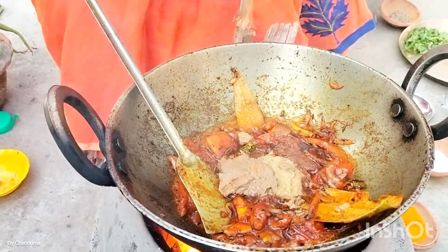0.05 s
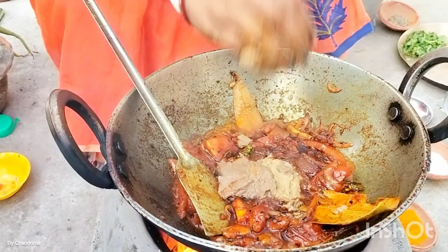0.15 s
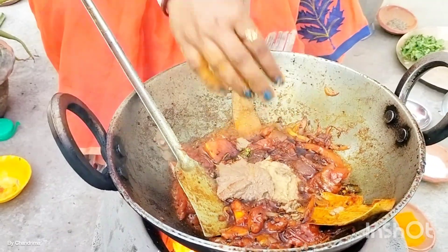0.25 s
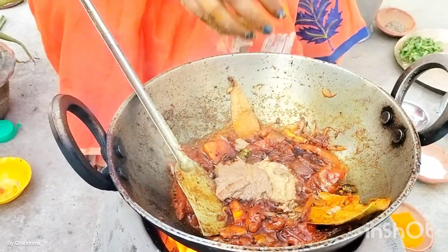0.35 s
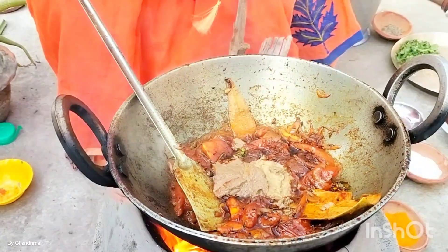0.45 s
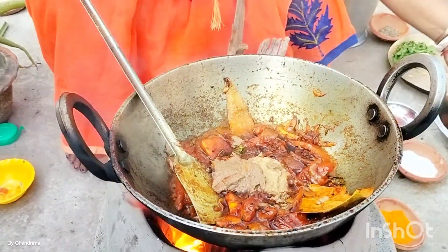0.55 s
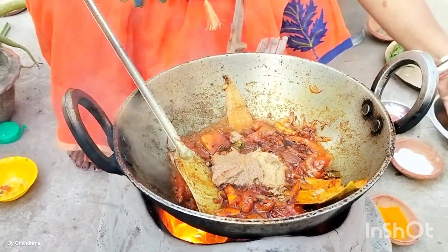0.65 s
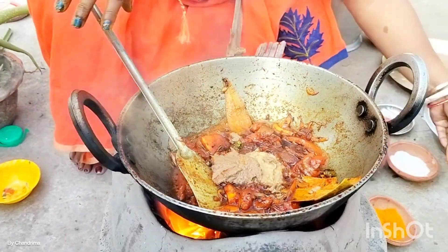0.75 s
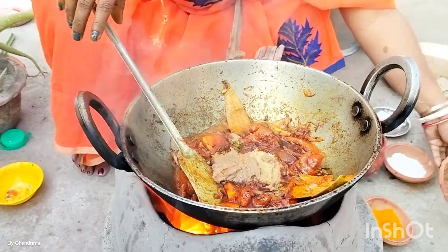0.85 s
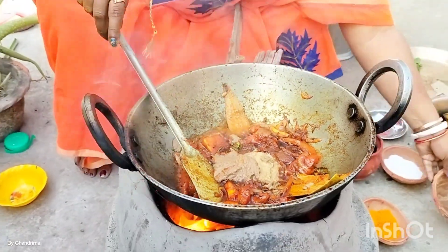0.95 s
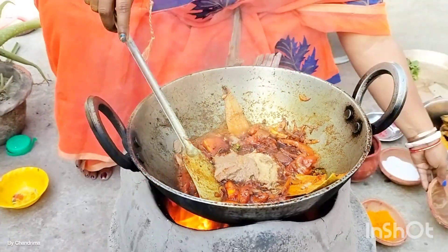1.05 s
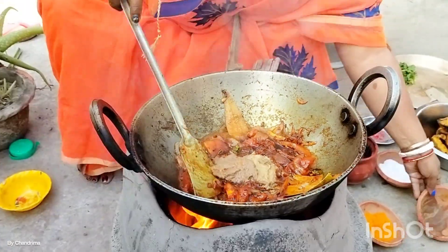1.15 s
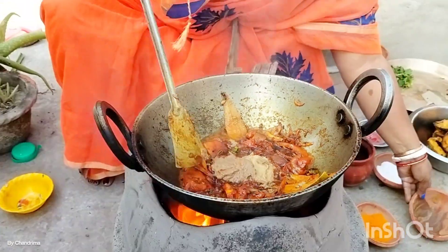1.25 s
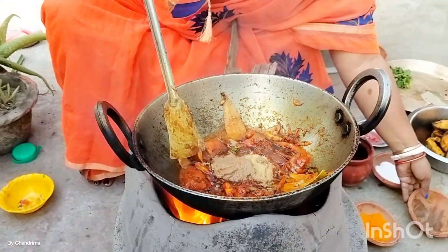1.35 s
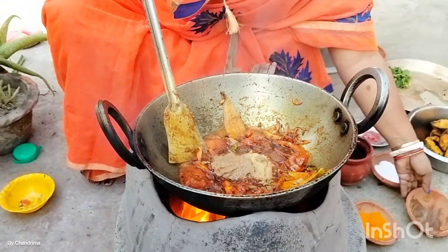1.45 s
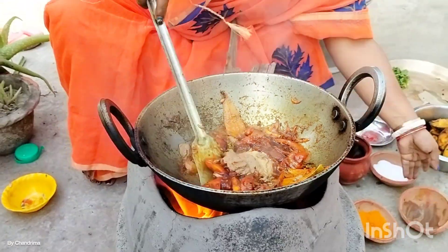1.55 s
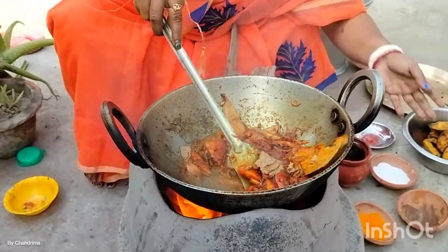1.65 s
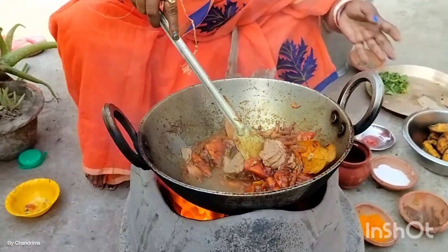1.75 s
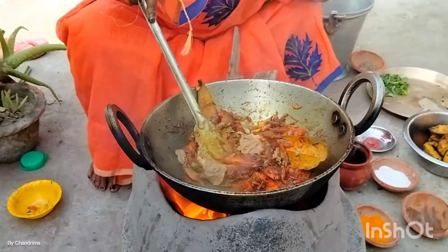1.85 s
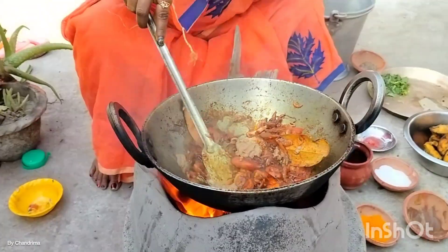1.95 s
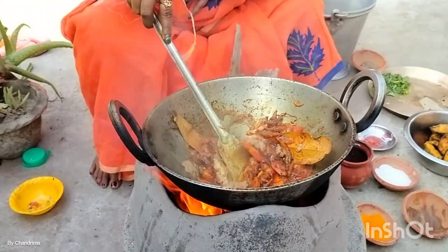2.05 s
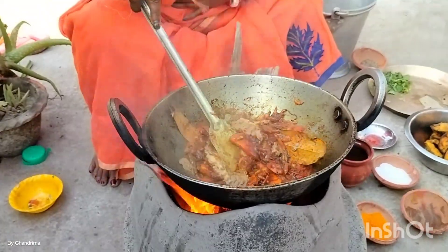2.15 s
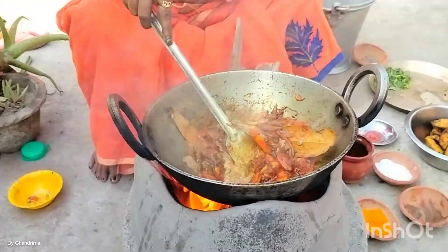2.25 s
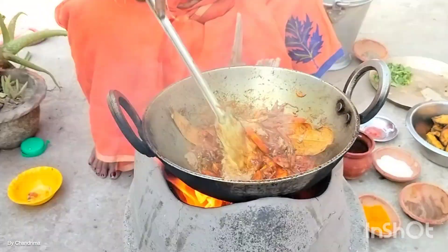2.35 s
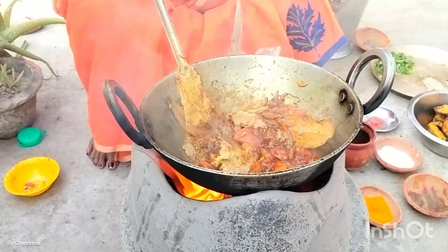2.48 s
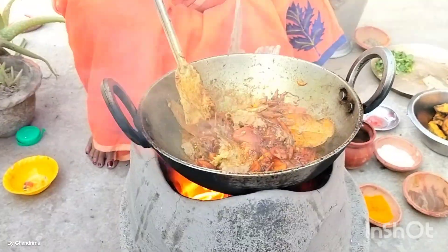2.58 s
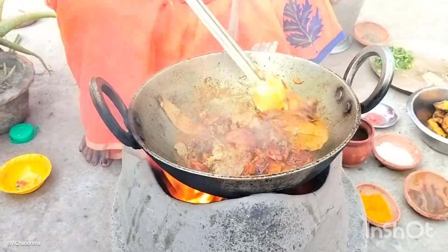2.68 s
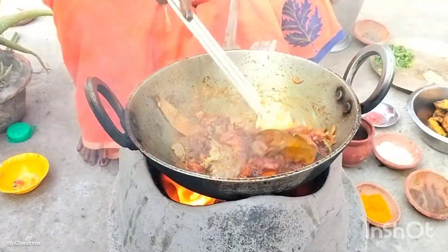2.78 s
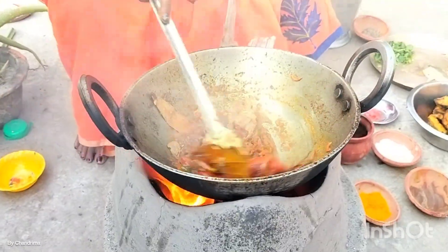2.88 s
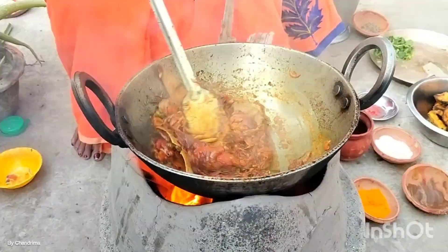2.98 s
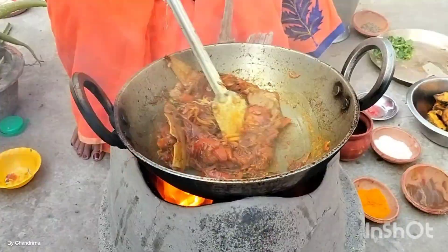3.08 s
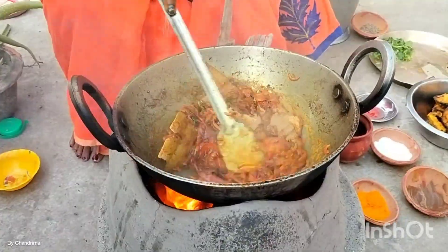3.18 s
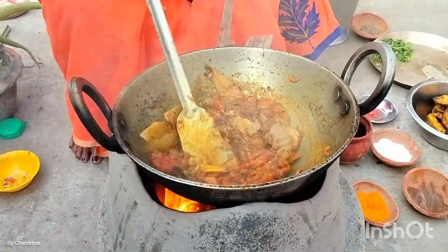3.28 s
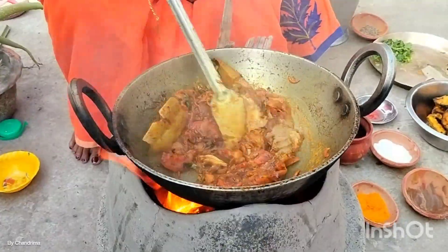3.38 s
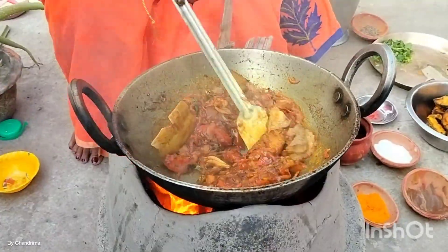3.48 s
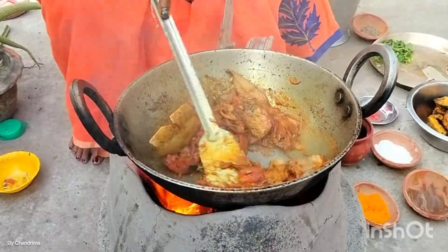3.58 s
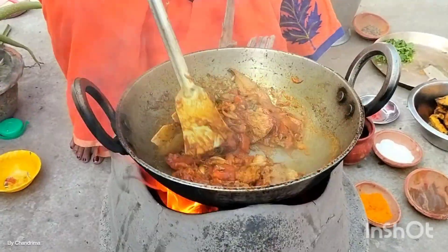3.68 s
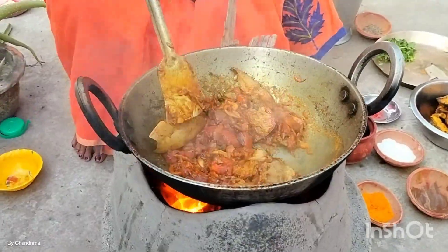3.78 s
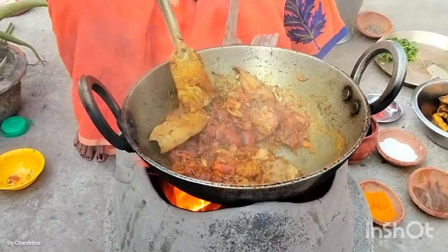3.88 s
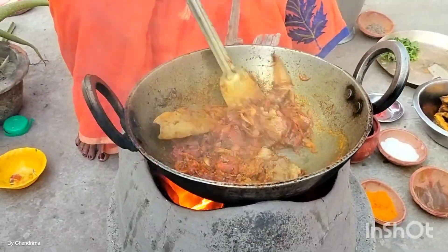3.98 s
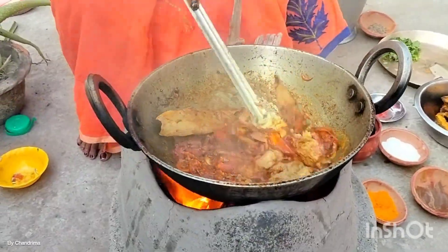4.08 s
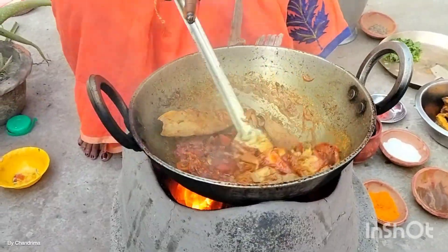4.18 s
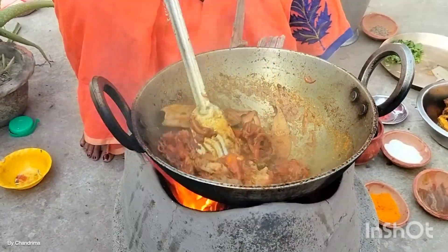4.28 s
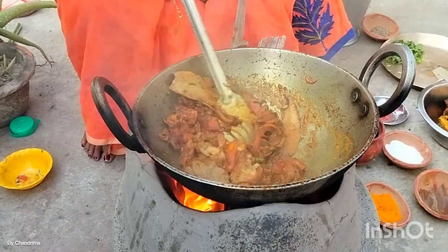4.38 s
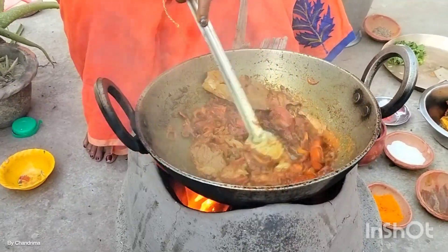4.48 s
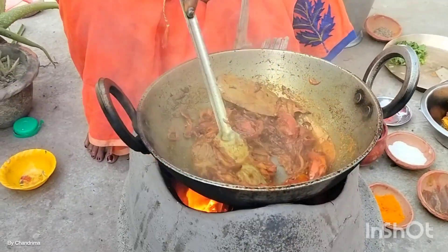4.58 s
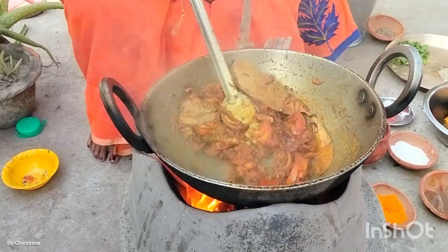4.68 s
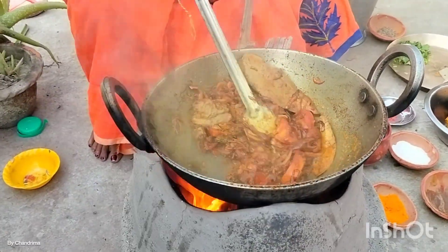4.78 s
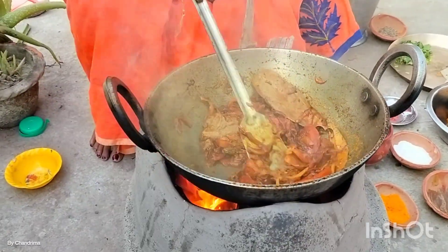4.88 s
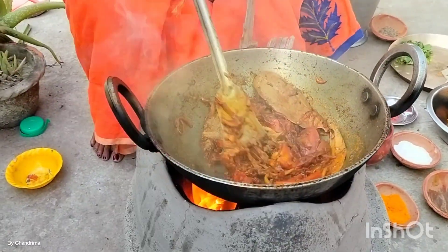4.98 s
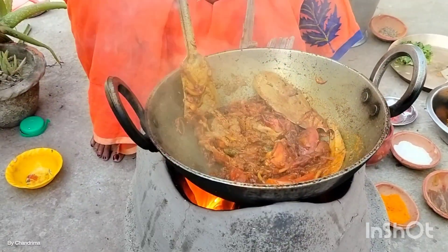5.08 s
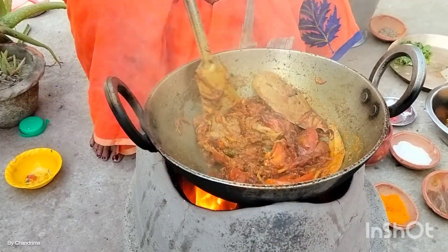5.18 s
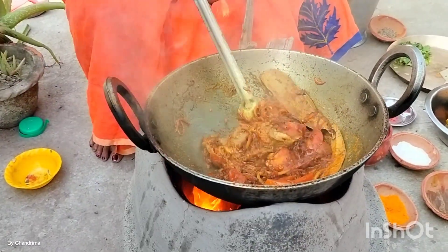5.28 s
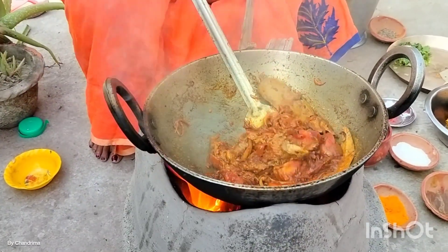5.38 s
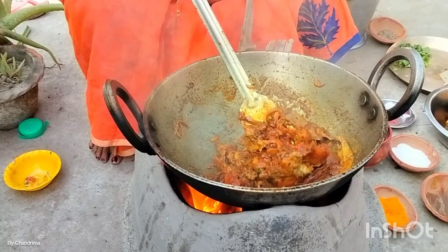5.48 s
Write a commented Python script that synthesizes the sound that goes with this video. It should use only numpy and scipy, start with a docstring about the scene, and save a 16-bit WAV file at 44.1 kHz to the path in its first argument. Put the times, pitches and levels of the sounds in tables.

```python
"""Outdoors, onions and spice paste fry in oil in a wide steel pan, heard by two microphone ports.
Many tiny steam bursts make the fizz, a few single ones spit loudly, and short gliding tones are large bubbles.
Many short rising tones blend into a low scraping, stirring texture. A spatula thuds and scrapes, ringing the pan.
Filtered noise makes the top hiss and the wind, strongest at left. The left port has a strong 4 kHz resonance.
Sometimes the sound drops briefly and fades back; thin ticks are heard.
"""
import sys
import numpy as np
from scipy import signal
from scipy.fft import rfft, irfft, next_fast_len
from scipy.io import wavfile
from scipy.ndimage import uniform_filter1d, minimum_filter1d, map_coordinates

SR = 44100
rng = np.random.default_rng(int(sys.argv[2]) if len(sys.argv) > 2 else 0)


def dump(signal):
    """Clip the signal to [-1, 1] and save it as 16-bit WAV at the path in sys.argv[1]."""
    limited = np.clip(np.atleast_2d(signal).T, -1, 1)
    pcm = np.round(limited * 32767).astype(np.int16)
    wavfile.write(sys.argv[1], SR, pcm)


N = 244314  # length of the scene in samples

# Strength of the frying: (time [s], fizz level [dB])
FRY_LEVEL = [(0, -23.5), (.065, -21.5), (.085, -18), (.22, -22), (.24, -21.5), (.46, -22), (.48, -28.5),
             (.79, -26), (1.05, -27.5), (1.3, -25.5), (1.42, -24), (1.53, -23), (1.58, -21), (1.64, -21.5),
             (1.675, -17.5), (1.72, -19), (1.93, -19), (1.955, -22.5), (1.99, -19), (2.08, -17),
             (2.22, -21), (2.34, -20), (2.46, -17), (2.53, -20), (2.78, -18.5), (2.84, -16.5),
             (2.87, -18.5), (3.0, -17.5), (3.4, -18.5), (3.69, -18.5), (3.72, -19.5), (3.785, -17.5),
             (3.84, -18.5), (3.92, -21), (4.21, -16.5), (4.6, -18.5), (4.89, -19.5), (5.08, -17),
             (5.12, -20.5), (5.37, -17.5), (5.54, -18.5)]
# How the fizz changes:
# (time [s], brightness above about 4 kHz [dB], lean to the left [dB], top hiss relative to the fizz [dB])
FIZZ_SHADE = [(0, -4.5, 2.5, -39.5), (.2, 9, 6, -37.5), (.46, 0.5, 3.5, -39.5), (.7, 3, 2, -39.5),
              (1.0, -1.5, 0, -38), (1.29, -3.5, 3, -46.5), (1.33, 3.5, 5.5, -43.5), (1.42, 3, 1.5, -36.5),
              (1.6, -3, 1.5, -40.5), (1.7, -0.5, 2, -37.5), (2.4, -0.5, 3.5, -42), (3.2, 2.5, -0.5, -33.5),
              (3.7, 0.5, 0.5, -37), (4.2, 1, 2.5, -38), (4.7, 3.5, 0.5, -34.5), (5.54, -1.5, -0.5, -37)]
# Colour of a burst at each port: (frequency [Hz], gain [dB])
LEFT_COLOUR = [(250, -36), (450, -27), (1000, -17), (2000, -14), (2600, -8), (3300, -4), (3600, 0.5),
               (3900, 2.5), (4200, 0.4), (4600, -5.5), (5800, -6), (6500, -23), (7500, -35.5),
               (8800, -69.5)]
RIGHT_COLOUR = [(200, -45), (300, -26), (450, -32.5), (1300, -14.5), (1900, -18.5), (2200, -16),
                (2700, -12), (3800, -12.5), (4700, -16), (5900, -15), (6700, -27.5), (7200, -23),
                (8600, -48.5), (9400, -78.5)]
# Colour of the top hiss, only its shape matters: (frequency [Hz], gain [dB])
TREBLE_COLOUR = [(5650, -48), (9600, -9), (10900, -7), (11800, 1), (14700, -1.5), (15800, -13.5)]
# Colour of the steady wind, only its shape matters: (frequency [Hz], gain [dB])
WIND_COLOUR = [(25, -16), (55, -3.5), (120, -1.5), (160, 0.5), (210, -8), (300, -18.5)]
# Puffs of wind on the left port:
# (time [s], length [s], peak of the push [dB], push frequency [Hz], flutter relative to the push [dB])
WIND_PUFFS = [(5.281, .016, -36, 160, 3), (5.3, .022, -24, 125, -5)]
# Loud single bursts:
# (time [s], left peak before the limiter [dB], bubble pitch [Hz], resonance width [Hz],
#  right port against its usual share [dB])
LOUD_SPITS = [(.0084, -6, 2900, 2500, -6), (.0274, -6, 2400, 1200, -9), (.4398, -2, 3900, 1200, 1),
              (.47, -1, 3000, 2500, 5), (.7668, -11, 1900, 2500, 0), (.7765, -9, 3400, 1800, -6),
              (.7937, -2, 5800, 5000, -1), (.8066, -10, 2400, 3500, -4), (.8721, -2, 4100, 1600, -3),
              (.9532, -7, 3900, 9000, -1), (.9776, -3, 3000, 3500, 6), (1.0275, -8, 4500, 1800, -8),
              (1.0818, -11, 4900, 3500, -7), (1.1035, -10, 4300, 3000, -1), (1.1244, -2, 3400, 1500, -4),
              (1.1978, -7, 3400, 1200, -8), (1.4364, -4, 5500, 4000, -1), (1.472, -3, 5400, 3500, -3),
              (1.5434, -4, 3500, 3500, -2), (1.5721, -1, 3600, 2500, -4)]
# Single large bubbles: (time [s], length [s], peak [dB], first pitch [Hz], last pitch [Hz])
LARGE_BUBBLES = [(0.375, 0.02, -27, 660, 770), (.999, 0.009, -31, 520, 580), (1.003, 0.032, -31, 790, 940),
                 (3.903, 0.034, -31, 912, 930), (5.1, .048, -26, 700, 740), (5.089, 0.044, -29, 1770, 1740)]
# Thin full-band ticks: (time [s], level [dB], lean to the left [dB])
THIN_TICKS = [(.4699, -22, -16), (1.6113, -26, 4)]
# Brief drops of the whole sound: (time [s], depth [dB], recovery time constant [s])
LEVEL_DROPS = [(.4715, -9, .02), (.98, -7, .015), (1.592, -22, .009), (3.795, -6, .02)]
# Ringing modes of the pan, damped by the food: (frequency [Hz], level [dB], time to fade by 60 dB [s])
PAN_MODES = [(320, -1, 0.077), (387.5, 2.5, 0.051), (537, -5, 0.083), (668, -1.5, 0.073),
             (938, 3.5, 0.0099), (1260, -1, 0.017), (1381, 12, 0.01)]
# The spatula meets the bottom and drags:
# (time [s], drag length [s], thud level [dB], favoured pitch [Hz], swell of the stirring texture [dB])
SPATULA_STROKES = [(1.317, 0.11, -42.5, 447, -39), (1.759, 0.074, -34.5, 384, -42),
                   (2.021, .06, -36, 410, -37), (2.415, .001, -15.5, 390, -57),
                   (2.522, 0.058, -35, 384, -34.5), (2.914, 0.02, -32, 338, -34),
                   (2.968, 0.059, -35, 352, -44), (3.282, .012, -26.5, 1390, -48),
                   (3.287, .001, -22, 324, -50), (3.771, .001, -26.5, 390, -55),
                   (3.871, .012, -26, 1290, -33), (3.881, .001, -21.5, 334, -47),
                   (4.096, .001, -25, 340, -56), (4.606, 0.055, -32, 463, -34),
                   (5.102, .065, -30, 430, -33)]

# The 4 kHz ridge of the fizz stands out more as the frying grows and dulls (dB per dB)
RIDGE_HZ, RIDGE_WIDTH_HZ, RIDGE_FOLLOWS = 3900, 1100, 0.39
# Stirring texture between strokes, its dB per dB of fizz, and the swell after a stroke
STIR_DB, STIR_FOLLOWS, SWELL_RISE_S, SWELL_FALL_S = -40.5, 1, 0.0057, 0.095
# Time between slips of a drag, their scatter in level, and in favoured pitch (octaves)
SLIP_S, SLIP_SCATTER_DB, SPOT_SCATTER_OCTAVES = .011, 5, 0.16
# Modes weaken away from the favoured pitch, above it only down to a floor; slips fade along the drag
SPOT_DB_PER_OCTAVE, HIGH_MODE_FLOOR_DB, FADE_DB_PER_S = 30, -12.5, 36
# Rubbing noise relative to the thud (longer drags add to it), and its soft tail
SCRAPE_DB, SCRAPE_TAIL_S = -13, .025
TOP_HZ = 15780  # nothing is kept at or above this frequency


def amp(db):
    """Turn decibels into a gain."""
    return 10 ** (np.asarray(db) / 20)


def unit(x):
    """Scale a signal to an average strength (rms) of 1."""
    return x / np.sqrt(np.mean(x ** 2) + 1e-20)


def along(points, hz):
    """Read a colour table on a log frequency axis, falling away outside its points."""
    f, db = np.transpose(points)
    f_wide = np.r_[f[0] / 8, f, f[-1] * 1.1]
    db_wide = np.r_[db[0] - 60, db, -120]
    return np.interp(np.log(hz + 1), np.log(f_wide), db_wide)


def level(table, column):
    """Draw one dB column of a timed table as a value for every sample."""
    rows = np.array(table)
    return np.interp(np.arange(N) / SR, rows[:, 0], rows[:, column])


def wobble(rate):
    """Make a smooth random curve with `rate` random points a second."""
    knots = rng.standard_normal(int(N * rate / SR) + 4)
    return map_coordinates(knots, [np.arange(N) * rate / SR])


def filtered(x, response):
    """Colour a signal by a gain that depends on frequency."""
    size = next_fast_len(N + 8192)
    return irfft(rfft(x, size) * response(np.fft.rfftfreq(size, 1 / SR)), size)[..., :N]


def high_pass(hz, corner_hz, order):
    """Gain that falls steeply under the corner."""
    return 1 / np.sqrt(1 + (corner_hz / (hz + 1)) ** (2 * order))


def through_pan(hz, share):
    """Each pan mode is a resonance that adds to the direct sound."""
    modes = sum(amp(db) * 1j * hz * (0.97 / t60) / (mode_hz ** 2 - hz * hz + 1j * hz * (0.45 / t60))
                for mode_hz, db, t60 in PAN_MODES)
    return 1 + share * modes


def port_pulses(size=2048):
    """Each port answers a burst with its colour, as early as possible (minimum phase)."""
    hz = np.fft.rfftfreq(size, 1 / SR)
    colour = amp([along(LEFT_COLOUR, hz), along(RIGHT_COLOUR, hz)])
    cepstrum = irfft(np.log(colour + 1e-6), size)
    # Folding the cepstrum moves all the energy to after the start
    cepstrum[:, 1:size // 2] *= 2
    cepstrum[:, size // 2 + 1:] = 0
    return irfft(np.exp(rfft(cepstrum)), size)[:, :size // 2]


def bursts(s, gain, lag_s, pan_db):
    """Impulses at both ports, with a delay and a level balance between the ports."""
    out = np.zeros((2, N + 64))
    for port, side in enumerate((.5, -.5)):
        at = np.clip(s + side * lag_s, 0, N / SR) * SR
        k, part = at.astype(int), at % 1
        g = gain * amp(side * pan_db)
        # Share each impulse between two samples, for times that fall in between
        out[port] = np.bincount(np.r_[k, k + 1], np.r_[g * (1 - part), g * part], N + 64)
    return out[:, :N]


def swarm(count, spread_db, width_s):
    """Random bursts over the whole pan; strengths spread wider when calm, so single ones stand out."""
    u, z = rng.random((count, 2)), rng.standard_normal((count, 3))
    fizz_db = level(FRY_LEVEL, column=1)[(u[:, 0] * N).astype(int)]
    calm = np.clip((-19 - fizz_db) / 10, 0, 1)
    size_db = -(spread_db + 0.4 * calm) * (np.log(1.001 - u[:, 1]) + 1.5)
    size = amp(size_db) * np.sign(z[:, 2])
    return bursts(u[:, 0] * N / SR, size, lag_s=5e-5 + width_s * z[:, 0], pan_db=5.1 * z[:, 1])


def patchy(x, patchy_db, bins=6, frames=10):
    """Random patches of gain in time and frequency make the sound wander."""
    z = signal.stft(x, nperseg=512)[2]
    field = uniform_filter1d(rng.standard_normal(z.shape[1:]), bins, 0)
    field = uniform_filter1d(field, frames, 1)
    return signal.istft(z * amp(patchy_db * unit(field)), nperseg=512)[1][:, :N]


def ring(s, gain, hz, cycles, rise, length=.05, onset=0.42):
    """Damped sines with a soft start, fading 60 dB over some cycles and gliding in pitch."""
    t = np.arange(round(length * SR)) / SR
    turns = hz[:, None] * t
    life = turns / np.reshape(cycles, (-1, 1))
    wave = np.sin(2 * np.pi * turns * (1 + rise * np.minimum(life, 1)))
    wave = gain[:, None] * wave * amp(-60 * life) * (1 - np.exp(-turns / onset))
    at = (s[:, None] * SR).astype(int) + np.arange(len(t))
    return np.bincount(at.ravel(), wave.ravel(), N + SR)[:N]


def frying(pulse):
    """Countless steam bubbles burst all over the pan and blend into a fizz coloured by the ports."""
    fry_db, bright_db = level(FRY_LEVEL, column=1), level(FIZZ_SHADE, column=1)
    impulses = patchy(swarm(count=110000, spread_db=2.5, width_s=7e-5), patchy_db=1.0)
    fizz = signal.fftconvolve(impulses, pulse, axes=1)[:, :N]

    # Smaller bubbles, brighter fizz
    upper = filtered(fizz, lambda hz: high_pass(hz, 4030, order=4))
    fizz = fizz + (amp(bright_db) - 1) * upper

    ridge_db = RIDGE_FOLLOWS * (fry_db - fry_db.mean() - bright_db)
    ridge = filtered(fizz, lambda hz: np.exp(-((hz - RIDGE_HZ) / RIDGE_WIDTH_HZ) ** 2))
    fizz = fizz + (amp(ridge_db) - 1) * ridge

    # Leaning left mostly means a weaker right port
    fizz = fizz * amp(level(FIZZ_SHADE, column=2) * [[.1], [-.9]])
    return fizz / np.std(fizz.mean(0)) * amp(fry_db + 0.26 * wobble(7.9) + 0.33 * wobble(35))


def stirring(count=5000):
    """Many short tones, each rising in pitch, blend into a low scraping texture that swells after each stroke."""
    u = rng.random((count, 3))
    tones = ring(u[:, 0] * N / SR, amp(-2.2 * np.log(1.01 - u[:, 1])), 430 * 4.15 ** u[:, 2],
                 cycles=23.0, rise=0.14, length=0.028)

    def swell(start_s):
        t = np.maximum(np.arange(N) / SR - start_s, 0)
        return (1 - np.exp(-t / SWELL_RISE_S)) * np.exp(-t / SWELL_FALL_S)

    swells = sum(amp(db) * swell(s) / swell(0).max() for s, *_, db in SPATULA_STROKES)
    fizz_db = level(FRY_LEVEL, column=1)
    steady = amp(STIR_DB + STIR_FOLLOWS * (fizz_db - fizz_db.mean()) + 1.2 * wobble(8))
    texture = unit(tones) * np.hypot(steady, swells) * amp([[.5], [-.5]])
    return filtered(texture, lambda hz: high_pass(hz, 568, order=4) * through_pan(hz, share=0.36))


def treble():
    """A faint hiss at the very top flickers, from separate noise left and right, following the fizz."""
    hiss = patchy(rng.standard_normal((2, N)), patchy_db=5.5, bins=2, frames=3)
    hiss = unit(filtered(hiss, lambda hz: amp(along(TREBLE_COLOUR, hz)) * (hz > 9600)))
    return amp(level(FRY_LEVEL, column=1) + level(FIZZ_SHADE, column=3)) * hiss


def wind():
    """Low noise rumbles, mostly at the left port, where short puffs push and flutter."""
    rumble = filtered(rng.standard_normal((2, N)), lambda hz: amp(along(WIND_COLOUR, hz)))
    left, right = unit(rumble)
    left = left * amp(-60.5 + 2 * wobble(6))

    t = np.arange(N) / SR
    flutter = filtered(rng.standard_normal(N), lambda hz: np.exp(-np.log2((hz + 1) / 430) ** 2 / 0.46))
    flutter = unit(flutter)
    for s, length, db, push_hz, flutter_db in WIND_PUFFS:
        shape = np.sin(np.pi * np.clip((t - s) / length, 0, 1)) ** 2
        push = np.cos(2 * np.pi * push_hz * (t - s))
        left = left + amp(db) * shape * (push + amp(flutter_db) * flutter)
    # The right port takes a little of the left wind and a faint rumble of its own
    return np.array([left, amp(-17) * left + amp(-67) * right])


def spits(pulse):
    """A loud spit is one bubble: a sharp tick, or a cycle or two of ringing if its resonance is narrow."""
    s, db, pitch, width, right_db = np.array(LOUD_SPITS).T[..., None, None]
    size = 2 * pulse.shape[1]
    hz = np.fft.rfftfreq(size, 1 / SR)
    # A small random delay of the left port against the right
    lag_s = 1e-3 + 5e-5 * (1 + rng.standard_normal(s.shape)) * [[1], [0]]
    resonance = 1j * hz * width / (pitch ** 2 - hz * hz + 1j * hz * width)
    shape = irfft(rfft(pulse, size) * resonance * np.exp(-2j * np.pi * hz * lag_s), size)
    left = np.abs(shape[:, :1])
    shape = shape * amp(db + right_db * [[0], [1]]) / left.max(-1, keepdims=True)
    # The left peak falls exactly on the listed time
    start = np.round(s * SR).astype(int) - left.argmax(-1)[..., None]
    at = start[:, 0] + np.arange(size)
    return np.array([np.bincount(at.ravel(), shape[:, port].ravel(), N)[:N] for port in range(2)])


def plops():
    """Each large bubble is a short tone that swells and dies while its pitch glides."""
    out = np.zeros(N)
    for s, length, db, first_hz, last_hz in LARGE_BUBBLES:
        count = round(length * SR)
        turns = np.cumsum(np.linspace(first_hz, last_hz, count)) / SR
        tone = np.sin(2 * np.pi * (turns + rng.random()))
        out[round(s * SR):][:count] += amp(db) * np.hanning(count) * tone
    return out


def ticks():
    """A tick is a one-sample snap, made a little dull at the top of the band."""
    s, db, pan_db = np.transpose(THIN_TICKS)
    snaps = bursts(np.round(s * SR) / SR, amp(db), 0 * s, pan_db)
    return filtered(snaps, lambda hz: 1 / (1 + (hz / 12000) ** 4))


def breaks():
    """A gain that drops within about a millisecond and fades back."""
    t = np.arange(N) / SR
    drop_db = sum(db * (t >= s) * np.exp(-np.abs(t - s) / back_s) for s, db, back_s in LEVEL_DROPS)
    return amp(uniform_filter1d(drop_db, size=44))


def spatula(count=9):
    """A dull thud, then slips of the dragging blade, ring pan modes near the pitch the spot favours."""
    s, drag_s, db, spot_hz, _ = np.array(SPATULA_STROKES).T[:, :, None, None]
    hz, mode_db, t60 = np.transpose(PAN_MODES)
    z = rng.standard_normal((len(s), count, 3 + len(hz)))
    later = np.arange(count)[:, None] > 0  # the first hit is the thud and does not scatter like the slips
    slip_s = SLIP_S * (np.arange(count)[:, None] + 0.15 * later * np.clip(z[..., :1], -2, 2))

    octaves_off = np.log2(hz / spot_hz) - SPOT_SCATTER_OCTAVES * later * z[..., 1:2]
    floor_db = np.where(octaves_off > 0, HIGH_MODE_FLOOR_DB, -np.inf)
    spot_db = np.maximum(-SPOT_DB_PER_OCTAVE * np.abs(octaves_off), floor_db)
    hit_db = db + SLIP_SCATTER_DB * later * z[..., 2:3] - FADE_DB_PER_S * slip_s
    gain = (slip_s <= drag_s) * amp(hit_db + mode_db + spot_db + 2.1 * z[..., 3:])

    heard = gain > 0
    s, hz, cycles = (np.broadcast_to(v, gain.shape)[heard] for v in (s + slip_s, hz, hz * t60))
    thuds = ring(s, gain[heard], hz, cycles, rise=-0.027, length=.08)
    return filtered(thuds, lambda hz: high_pass(hz, 310, order=5))


def scrape():
    """The blade rubs the bottom while it drags: uneven noise in the pan's modes, fading softly."""
    t = np.arange(N) / SR
    rub = np.zeros(N)
    for s, drag_s, db, *_ in SPATULA_STROKES:
        strength = amp(db + SCRAPE_DB) * np.sqrt(0.086 + drag_s / SCRAPE_TAIL_S)
        tail = np.exp(-np.maximum(t - s - drag_s, 0) / SCRAPE_TAIL_S)
        rub += strength * (t > s) * tail
    grit = rng.standard_normal(N) * amp(4 * wobble(120))
    grit = filtered(grit, lambda hz: through_pan(hz, share=0.51) * high_pass(hz, 300, order=7)
                    / (1 + (hz / 1200) ** 2))
    return unit(grit) * uniform_filter1d(rub, size=200)


def scene():
    """Add up everything in and around the pan; the brief drops leave only the ticks untouched."""
    pulse = port_pulses()
    steady = frying(pulse) + stirring() + treble() + wind()
    single = spits(pulse) + plops() + spatula() + scrape()
    return (steady + single) * breaks() + ticks()


def record(dry):
    """A quick limiter holds the loudest peaks, then everything from the band limit up is removed."""
    need = np.minimum(1, .9 / (np.abs(dry).max(0) + 1e-9))
    gain = minimum_filter1d(need, size=161)
    gain = uniform_filter1d(uniform_filter1d(gain, size=81), size=81)
    return filtered(dry * gain, lambda hz: hz < TOP_HZ)


dry = scene()
out = record(dry)
dump(out)
```